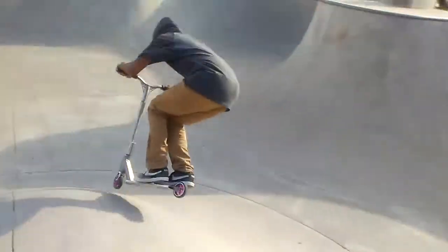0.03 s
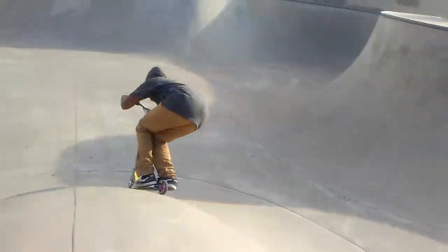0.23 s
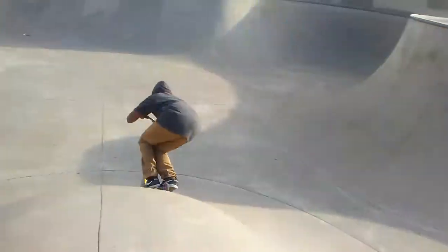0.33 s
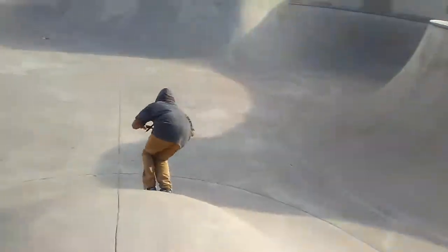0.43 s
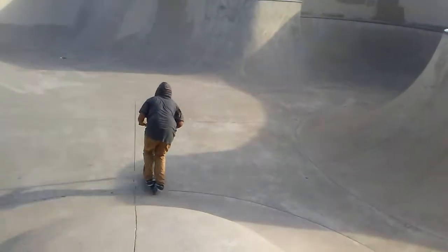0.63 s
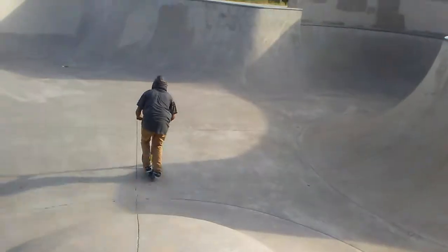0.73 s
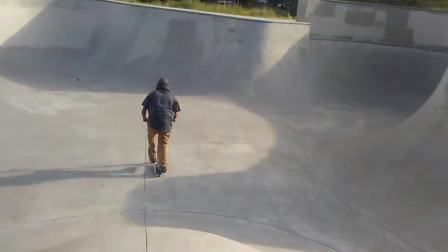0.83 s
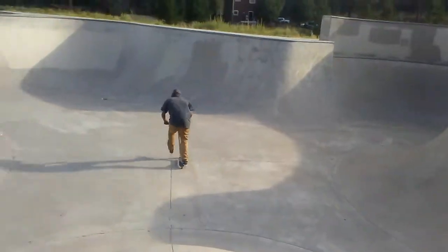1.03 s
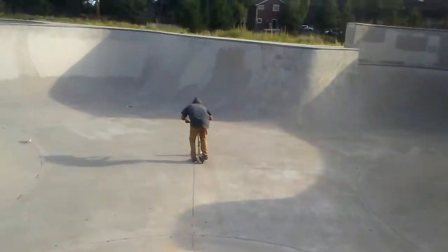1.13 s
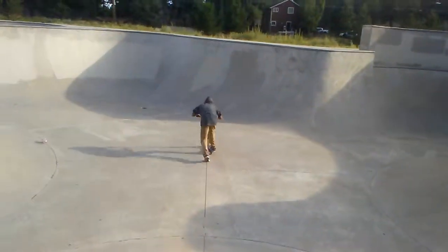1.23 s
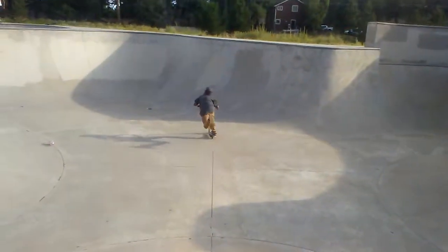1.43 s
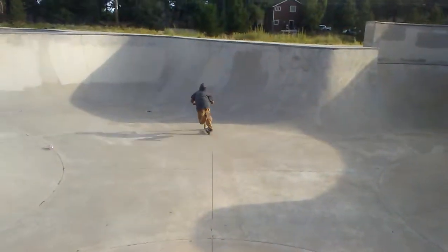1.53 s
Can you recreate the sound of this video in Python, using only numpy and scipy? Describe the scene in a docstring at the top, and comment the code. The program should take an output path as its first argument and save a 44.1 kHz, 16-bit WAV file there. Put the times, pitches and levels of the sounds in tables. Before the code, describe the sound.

In an outdoor skatepark, a scooter jumps with softly spinning wheels and comes down with one sharp clack. Its hard wheels then rumble across the concrete while the metal rings lightly and loose parts tick.

```python
"""Stunt scooter jump on concrete.

A scooter jumps a hump with its wheels whirring, thumps once, lands with a sharp clack and rolls away.
Hard wheels on gritty concrete rumble and keep the metal frame ringing; the deck knocks, loose parts
tick and a shoe pushes off. The open skatepark adds a faint, short echo."""
import sys
import numpy as np
from scipy import signal
from scipy.fft import rfft, irfft
from scipy.io import wavfile
from scipy.ndimage import uniform_filter1d

SR = 44100
rng = np.random.default_rng(int(sys.argv[2]) if len(sys.argv) > 2 else 0)


def output_pcm(signal):
    """Save a mono or channel-first signal as 16-bit PCM at the path in sys.argv[1].

    Samples are clipped to [-1, 1] before scaling.
    """
    pcm = np.clip(np.atleast_2d(signal).T, -1, 1) * 32767
    wavfile.write(sys.argv[1], SR, np.round(pcm).astype(np.int16))


N = 70560

# hard contact noise: freq_hz, level_db
CRACK_SPECTRUM = [(60, -48), (150, -27), (400, 7), (600, -6), (900, -8.5), (1800, 0), (2600, -9),
                  (4800, -11.5), (6500, -17), (9800, -19), (12000, -29.5), (16000, -42)]
# random flutter: rate_hz, level_db
FLUTTER_SPECTRUM = [(3, -23), (12, 2), (50, -1.5), (150, -16.5), (500, -65)]


def amp(db):
    """Decibels to gain."""
    return 10 ** (np.asarray(db) / 20)


def unit_rms(x):
    """Scale to an rms of one."""
    return x / np.sqrt(np.mean(x ** 2) + 1e-20)


def curve(points, column=1):
    """One column of a time table, interpolated per sample."""
    points = np.array(points)
    return np.interp(np.arange(N) / SR, points[:, 0], points[:, column])


def add(mix, start_s, sound):
    """Mix a sound in at start_s."""
    part = mix[max(round(start_s * SR), 0):][:len(sound)]
    part += sound[:len(part)]


def decay(t, t60_s):
    """Exponential fall, 60 dB in t60_s."""
    return np.exp(-np.log(1000) * t / t60_s)


def coloured(x, spectrum):
    """Filter by a (freq_hz, level_db) table; unit rms."""
    hz, db = np.transpose(spectrum)
    bins_hz = np.fft.rfftfreq(len(x), 1 / SR)
    gain = amp(np.interp(np.log(bins_hz + 1), np.log(hz), db))
    return unit_rms(irfft(rfft(x) * gain, len(x)))


def noise(spectrum, samples=N):
    """Coloured Gaussian noise."""
    return coloured(rng.standard_normal(samples), spectrum)


def steadied(x, samples):
    """Even out swells slower than the window; unit rms."""
    power = uniform_filter1d(uniform_filter1d(x ** 2, samples), samples)
    return unit_rms(x / np.sqrt(abs(power) + 1e-9))


def flutter(depth_db):
    """Quick random gain wobble."""
    return amp(depth_db * noise(FLUTTER_SPECTRUM))


def resonate(x, pitch_hz, width_hz):
    """Steep resonance that can follow a pitch curve."""
    carrier = np.exp(2j * np.pi * np.cumsum(pitch_hz * np.ones(N)) / SR)
    pole = np.exp(-np.pi * width_hz / SR)
    baseband = signal.lfilter([1], [1, -2 * pole, pole * pole], x / carrier)
    return unit_rms((carrier * baseband).real)


def ring(modes, t):
    """Decaying modes of a struck body, alternating in sign."""
    return sum((-1) ** k * amp(db) * decay(t, t60_s) * np.sin(2 * np.pi * hz * t)
               for k, (hz, db, t60_s) in enumerate(modes))


def rattled(modes, t, detune=0.007, onset_s=0.015):
    """Loose joints shake the pitch and level of ringing modes."""
    drift_s = np.cumsum(detune * noise(FLUTTER_SPECTRUM)[:len(t)]) / SR
    shake = flutter(depth_db=2.5)[:len(t)] ** np.minimum(t / onset_s, 1)
    return ring(modes, t + drift_s) * shake


def burst(t, spectrum, t60_s, rise_s=0.00035):
    """Decaying contact noise."""
    hiss = steadied(noise(spectrum, len(t)), samples=120)
    return hiss * np.minimum(t / rise_s, 1) * decay(t, t60_s)


def grit_force(grains_per_s=2500, spread_db=2.5, grain_share=0.4):
    """Force on a wheel: sand grains over fine roughness."""
    grains = (rng.random(N) < grains_per_s / SR) * rng.choice([-1, 1], N)
    sizes = amp(spread_db * np.minimum(rng.exponential(1, N), 5))
    roughness = rng.standard_normal(N)
    return np.sqrt(grain_share) * unit_rms(grains * sizes) + np.sqrt(1 - grain_share) * roughness


def driven(modes, pitch_ratio=1):
    """Resonances sustained by a rough force."""
    force = grit_force()
    return sum(amp(db) * resonate(force, hz * pitch_ratio, width_hz) for hz, width_hz, db in modes)


def landing():
    """Hard blows ring the frame; sand then hisses under the wheels."""
    # blows: start_s, gain_db
    clacks = [(0.3538, -4.5), (0.3555, 0.5), (0.3587, -4.5), (0.3655, -25)]
    # frame modes: pitch_hz, level_db, t60_s
    frame_modes = [(282, -11, 0.058), (435, -19.5, 0.19), (582, -25, 0.015), (710.6, -10, 0.12),
                   (958, -0.5, 0.023), (1240, -21, 0.033), (1474, 6.5, 0.036), (1727, 5.5, 0.042),
                   (1810, 6, 0.018), (2067, 0.5, 0.044), (2522, -6, 0.033), (2985, -10.5, 0.025),
                   (3334, -5.5, 0.019), (3690, -5.5, 0.018), (4830, -7.5, 0.016), (5630, -15.5, 0.083),
                   (5850, -13.5, 0.035)]
    # sand hiss: freq_hz, level_db
    sand_spectrum = [(300, -18), (1000, -14), (3000, -43), (7000, 1), (10000, -3), (16000, -15)]
    out, t = np.zeros(N), np.arange(SR // 3) / SR
    for start_s, gain_db in clacks:
        clack = amp(-16) * rattled(frame_modes, t) + amp(-14.5) * burst(t, CRACK_SPECTRUM, t60_s=0.03)
        add(out, start_s, amp(gain_db) * clack)
    add(out, clacks[0][0], amp(-53) * burst(t, sand_spectrum, t60_s=0.63))
    return out


def deck_thuds(rise_s=0.0034, overtone_ratio=1.953):
    """Dull blows ring two low deck modes."""
    # blows: start_s, level_db, pitch_hz, overtone_db, t60_s
    thuds = [(0.2226, -11, 212.7, 2.5, 0.031), (0.2316, -14.5, 224, -6, 0.013),
             (0.354, -12.5, 176.4, 1, 0.052), (0.8114, -6.5, 280, -32, 0.029),
             (1.2915, -20, 237, 5, 0.0091), (1.3022, -31.5, 225, 8, 0.028), (1.46, -19, 255, -45, 0.036)]
    out, t = np.zeros(N), np.arange(SR // 3) / SR
    for start_s, db, hz, overtone_db, t60_s in thuds:
        modes = [(hz, db, t60_s), (hz * overtone_ratio, db + overtone_db, t60_s)]
        add(out, start_s, np.minimum(t / rise_s, 1) * ring(modes, t))
    return out


def shoes(slap_s=0.2248, rise_s=0.0016):
    """Shoes slap the deck before the landing; later one pushes off the gritty ground."""
    # upper deck modes: pitch_hz, level_db, t60_s
    deck_modes = [(1102, 3.5, 0.028), (1520, -1.5, 0.033), (2720, 0, 0.026), (3490, 2, 0.022),
                  (3970, -8, 0.025), (5680, -7.5, 0.037)]
    # heel and toe strikes: start_s, level_db, t60_s
    scuffs = [(1.2922, -25, .033), (1.3028, -33, 0.0094)]
    # sole on grit: freq_hz, level_db
    scuff_spectrum = [(300, 13.5), (800, 18.5), (1200, 10), (1450, 20), (2200, -13), (2900, 5.5),
                      (4600, 1.5), (5400, -6), (9000, -29), (16000, -34)]
    out, t = np.zeros(N), np.arange(SR // 3) / SR
    slap = amp(-26) * rattled(deck_modes, t) + amp(-25) * burst(t, CRACK_SPECTRUM, t60_s=0.044)
    add(out, slap_s, np.minimum(t / rise_s, 1) * slap)
    for start_s, db, t60_s in scuffs:
        add(out, start_s, amp(db) * burst(t, scuff_spectrum, t60_s))
    return out


def loose_parts(rise_s=0.0015, scatter_db=0.5):
    """Loose parts tick: a small ring plus a soft scuff, coloured anew each time."""
    # contacts: start_s, gain_db, ring_gain_db
    ticks = [(0.023, -7.5, 0), (0.048, -17, -3), (0.0814, 0, 3.5), (0.144, -11.5, 1.5), (0.184, -10.5, 4.5),
             (0.2553, -4, -17), (0.427, -0.5, -6.5), (0.4723, -6.5, -9), (0.6835, -0.5, -6.5),
             (0.7114, -20, 8), (0.9072, -13, 4), (1.008, -7, -18), (1.0779, -2.5, -9), (1.282, -5, -1),
             (1.414, -2.5, -4), (1.462, -4, -11.5)]
    # part modes: pitch_hz, level_db, t60_s
    part_modes = [(1464, 4, 0.025), (2040, -12, 0.032), (3250, -10.5, 0.039), (3500, -19, 0.015),
                  (5500, -23.5, 0.13), (8390, -11, 0.033)]
    # mean scuff spectrum: freq_hz, level_db
    tick_spectrum = [(200, -32), (1500, -6), (2100, 7.5), (4200, 1.5), (6500, -2.5), (9500, -6.5),
                     (12000, -12.5), (16000, -30)]
    out, t = np.zeros(N), np.arange(SR // 3) / SR
    hz, db = np.transpose(tick_spectrum)
    bands_hz = np.geomspace(200, 16000, num=40)
    mean_db = np.interp(np.log(bands_hz), np.log(hz), db)
    for start_s, gain_db, ring_gain_db in ticks:
        bands_db = mean_db + scatter_db * rng.standard_normal(len(bands_hz))
        scuff = burst(t, np.transpose([bands_hz, bands_db]), t60_s=0.04) * np.minimum(t / rise_s, 1)
        tick = amp(ring_gain_db - 30.5) * ring(part_modes, t) + amp(-38.5) * scuff
        add(out, start_s, amp(gain_db) * tick)
    return out


def wheel_whirr():
    """Bearings spin freely and flutter during the jump."""
    # bearing resonances: pitch_hz, width_hz, level_db
    modes = [(431, 45, -7), (1050, 110, -3.5), (1540, 330, 3.5), (1904, 210, -4.5), (3270, 520, -5.5),
             (3640, 250, -11), (5830, 470, -10.5), (8400, 4900, -10.5)]
    # whirr envelope: time_s, level_db
    levels = [(0, -45), (.055, -40.5), (.105, -44.5), (.14, -43.5), (.168, -50.5), (.2, -50.5),
              (.34, -47.5), (.38, -95)]
    return steadied(driven(modes), samples=1200) * amp(curve(levels)) * flutter(depth_db=1)


def wheel_rumble():
    """Deep rumble of hard wheels on concrete."""
    # rumble: freq_hz, level_db
    spectrum = [(15, -55), (33, -50), (44, -2), (54, 0), (66, 8.5), (82, -2.5), (98, -9), (120, -24),
                (200, -30), (500, -54)]
    # envelope: time_s, level_db
    levels = [(0.0, -57.5), (0.034, -35), (0.172, -45), (0.23, -35), (0.316, -52), (0.404, -52),
              (0.436, -47), (0.7, -44.5), (0.84, -35.5), (0.94, -43), (1.07, -50), (1.12, -41.5),
              (1.288, -35.5), (1.394, -40), (1.6, -40)]
    return steadied(noise(spectrum), samples=1800) * amp(curve(levels))


def wheel_roar(bumps_per_s=42, bump_share=0.39):
    """Small bumps and fine roughness in the slab drive a low roar."""
    # roar: freq_hz, level_db
    spectrum = [(60, -6.5), (110, 0), (150, 5), (200, -6.5), (265, -2.5), (350, -6), (440, -5.5),
                (560, -17), (900, -50), (2000, -76)]
    # envelope: time_s, gain_db
    gains = [(0.0, -56), (0.178, -50.5), (0.45, -46.5), (0.64, -47), (0.842, -40), (1.07, -44), (1.3, -45),
             (1.47, -47), (1.6, -50.5)]
    chance, size = rng.random((2, N))
    bumps = (chance < bumps_per_s / SR) * (0.5 + size) * rng.choice([-1, 1], N)
    force = np.sqrt(bump_share) * unit_rms(bumps) + np.sqrt(1 - bump_share) * grit_force()
    return steadied(coloured(force, spectrum), samples=2200) * amp(curve(gains) + 4.5)


def wheel_tone(sag_per_s=0.077):
    """Hollow tone of the rolling wheels, slowly falling."""
    # resonances at mid-scene: pitch_hz, width_hz, level_db
    modes = [(776, 134, 3), (1051, 116, -5)]
    # envelope: time_s, level_db
    levels = [(0, -67), (.35, -53.5), (.55, -50), (.8, -43.5), (1.05, -49.5), (1.3, -50.5), (1.6, -48.5)]
    pitch_ratio = np.exp(-sag_per_s * (np.arange(N) - N / 2) / SR)
    return steadied(driven(modes, pitch_ratio), samples=2000) * amp(curve(levels))


def wheel_grit():
    """Grit crunches under the wheels and excites wheels and fork."""
    # crunch: freq_hz, level_db
    spectrum = [(200, -10), (600, 4), (1200, 1), (1800, -25), (2250, -5.5), (2500, -0.5), (2900, -1.5),
                (4500, 1), (5250, -5.5), (5900, -6.5), (6600, -8.5), (9400, -11), (11500, -21),
                (16000, -46)]
    # wheel and fork resonances: pitch_hz, width_hz, relative_db
    fork_modes = [(1418, 32, -4), (3442, 180, -5.5), (3810, 130, -9.5), (4725, 100, -8), (5845, 590, -10.5)]
    # envelope: time_s, level_db
    levels = [(0, -56.5), (.16, -70), (.33, -56.5), (.39, -60), (.5, -53.5), (.62, -55.5), (.72, -51),
              (.9, -45.5), (.95, -53), (1.06, -54), (1.13, -53), (1.2, -46), (1.245, -47.5), (1.28, -44.5),
              (1.35, -48.5), (1.42, -50.5), (1.5, -56), (1.6, -63)]
    crunch = coloured(grit_force(), spectrum) + driven(fork_modes)
    return crunch * amp(curve(levels)) * flutter(depth_db=2)


def dip_swell(peak_s=0.72, rise_s=0.18, fall_s=0.1):
    """Wheels press harder in the dip at the foot of the hump."""
    # loaded wheels: freq_hz, level_db
    spectrum = [(300, -34), (900, 1), (1400, -3), (1950, 5), (2250, -8), (2500, 0), (3200, -9), (4500, -21),
                (9000, -33), (16000, -68)]
    t = np.arange(N) / SR - peak_s
    swell = np.exp(-abs(t) / np.where(t < 0, rise_s, fall_s))
    return amp(-38) * coloured(grit_force(), spectrum) * swell


def wheel_jolts(sigma_cycles=0.46):
    """Each pit or seam gives the wheels one short, soft shove."""
    # shoves: peak_s, level_db, pitch_hz
    jolts = [(0.397, -27, 109), (.527, -31, 200), (.631, -26.5, 234), (0.73, -27.5, 170), (0.738, -25, 73),
             (0.866, -26, 121), (.919, -29, 160), (.982, -29.5, 238), (1.036, -32.5, 202),
             (1.111, -25.5, 92), (1.154, -28.5, 242), (1.176, -26, 63), (1.395, -32, 307), (1.566, -31, 76)]
    out, t = np.zeros(N), np.arange(N) / SR
    for peak_s, db, hz in jolts:
        cycles = (t - peak_s) * hz
        out -= amp(db) * np.cos(2 * np.pi * cycles) * np.exp(-0.5 * (cycles / sigma_cycles) ** 2)
    return out


def frame_song():
    """Rolling sustains a cluster of frame resonances."""
    # cluster track: time_s, level_db, pitch_hz
    track = [(.33, -99, 1650), (.39, -42.5, 1680), (.47, -45, 1715), (.57, -39.5, 1690), (.71, -45.5, 1685),
             (.8, -39.5, 1598), (.88, -40.5, 1592), (.96, -55.5, 1603), (1.14, -51.5, 1713),
             (1.195, -37.5, 1575), (1.25, -47, 1643), (1.34, -41, 1622), (1.44, -49, 1690),
             (1.5, -48.5, 1640), (1.6, -57, 1630)]
    # resonances: pitch_ratio, width_hz, level_db
    modes = [(0.885, 73.6, -3.5), (1.002, 170, 8.5), (1.11, 146, -7)]
    force, pitch_hz = grit_force(), curve(track, column=2)
    song = sum(amp(db) * resonate(force, pitch_hz * ratio, width_hz) for ratio, width_hz, db in modes)
    return steadied(song, samples=1400) * amp(curve(track)) * flutter(depth_db=2)


def park_echo(x, taps_per_s=2000, delay_s=0.012):
    """Faint scatter from the concrete banks."""
    t = np.arange(SR // 2) / SR
    taps = rng.standard_normal(len(t)) * (rng.random(len(t)) < taps_per_s / SR)
    taps *= (t > delay_s) * decay(t, t60_s=0.43)
    return amp(-21) * signal.fftconvolve(x, taps / np.linalg.norm(taps))[:N]


def outdoor_air():
    """Steady, low background noise."""
    # air: freq_hz, level_db
    spectrum = [(25, -17), (100, 6.5), (400, 0), (600, -12), (1000, -16.5), (2100, -25.5), (4000, -17),
                (6500, -33), (9500, -27.5), (16000, -38)]
    return amp(-50.5) * noise(spectrum)


def scene():
    """Knocks with their echo, wheels, frame and air; mono."""
    knock_cutoff_hz = 113  # the knocks carry little below this
    highpass = signal.butter(2, knock_cutoff_hz, "highpass", fs=SR, output="sos")
    knocks = signal.sosfilt(highpass, landing() + deck_thuds() + shoes() + loose_parts())
    echo = park_echo(knocks)
    whirr = wheel_whirr()
    rolling = wheel_rumble() + wheel_roar() + wheel_tone() + wheel_grit() + dip_swell() + wheel_jolts()
    return (knocks + echo + whirr + rolling + frame_song() + outdoor_air())[None]


def record(dry):
    """Steep low-pass on the top treble."""
    cutoff_hz = 15900
    lowpass = signal.firwin(511, cutoff_hz, window=("kaiser", 9), fs=SR)
    return signal.oaconvolve(dry, lowpass[None], "same")


dry = scene()
out = record(dry)
output_pcm(out)
```